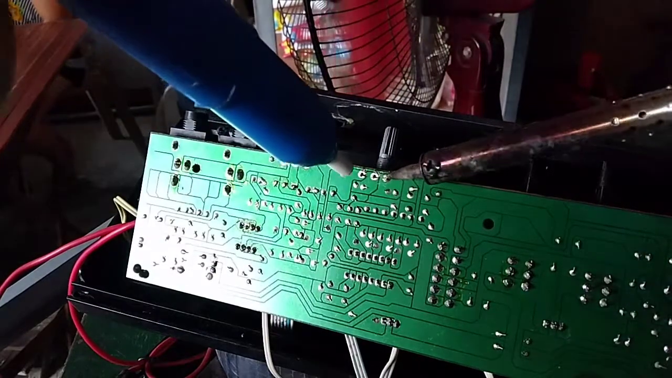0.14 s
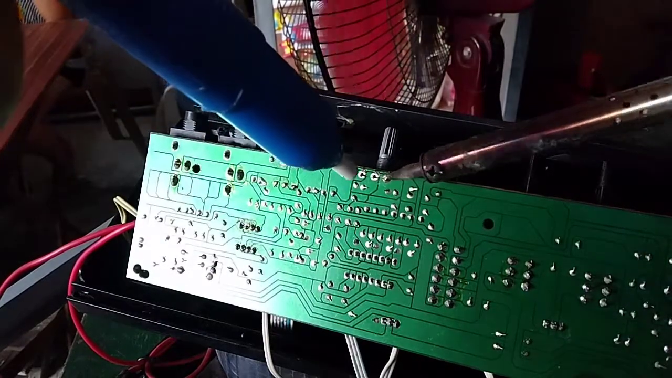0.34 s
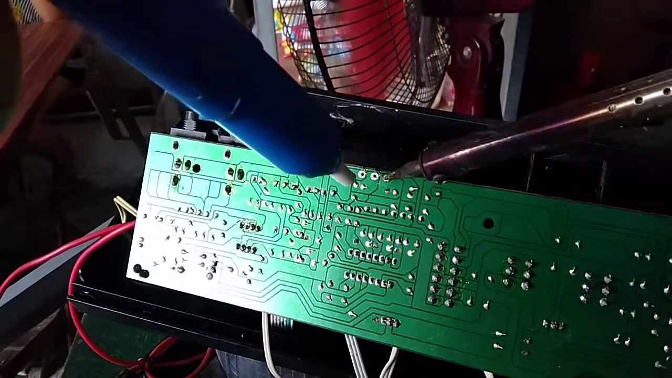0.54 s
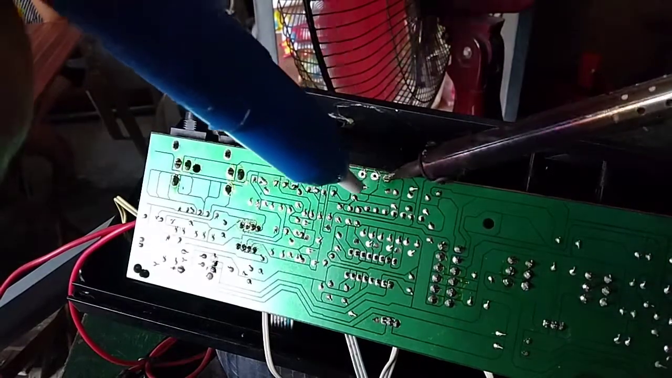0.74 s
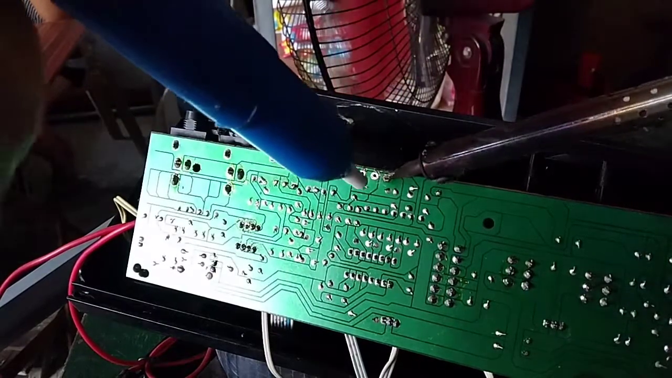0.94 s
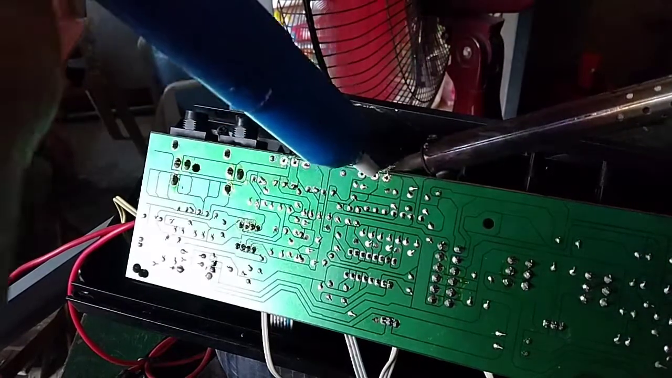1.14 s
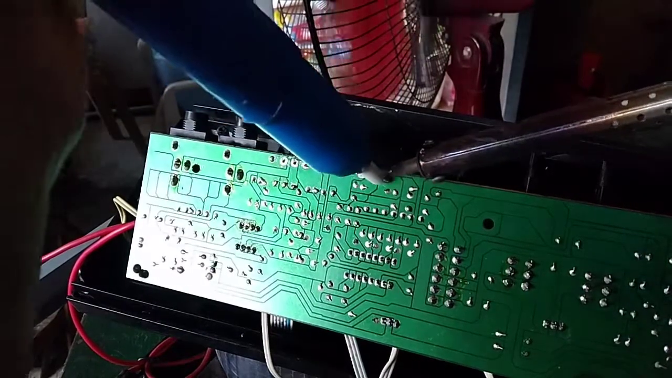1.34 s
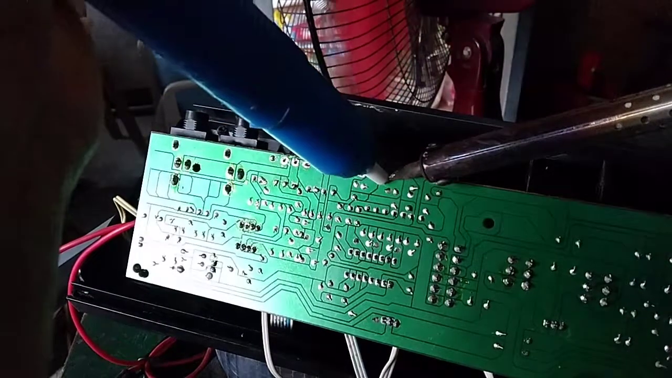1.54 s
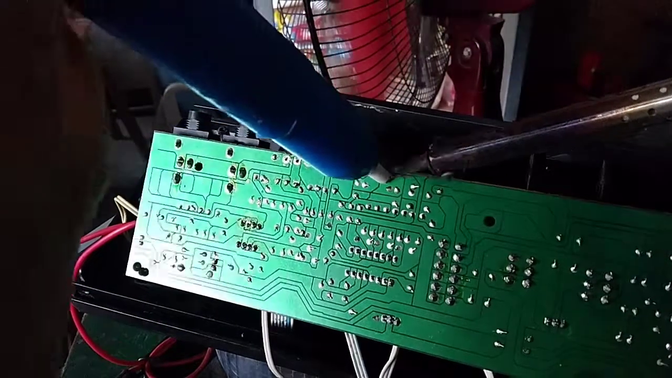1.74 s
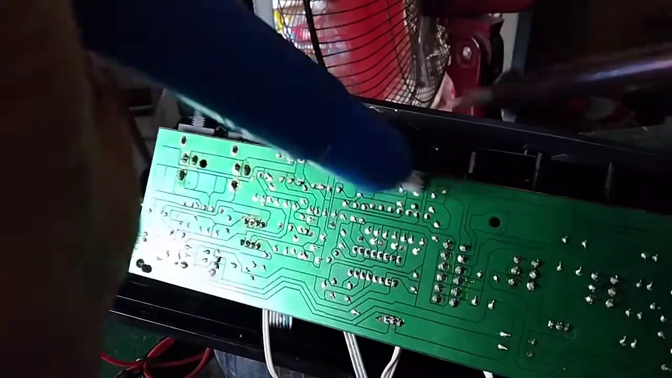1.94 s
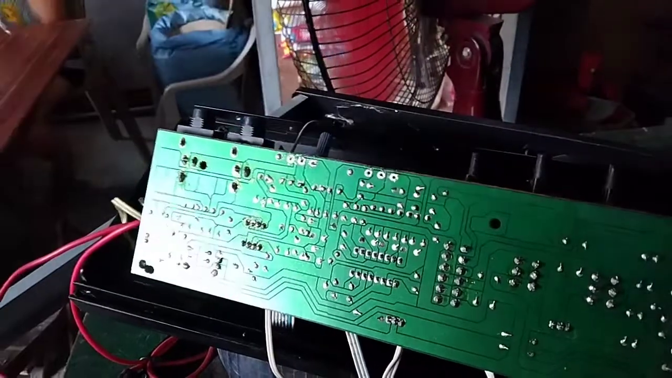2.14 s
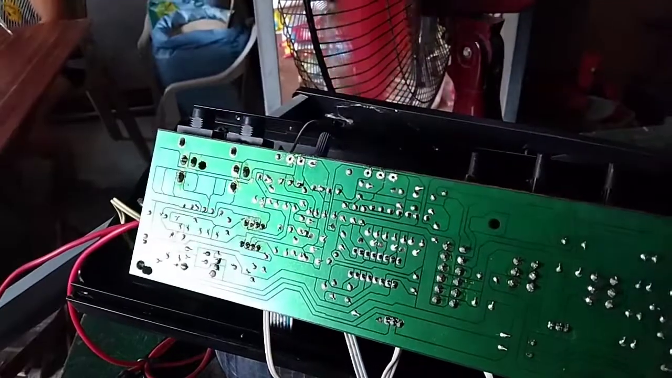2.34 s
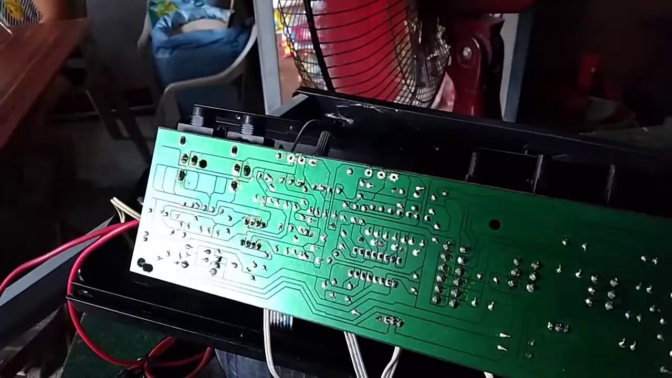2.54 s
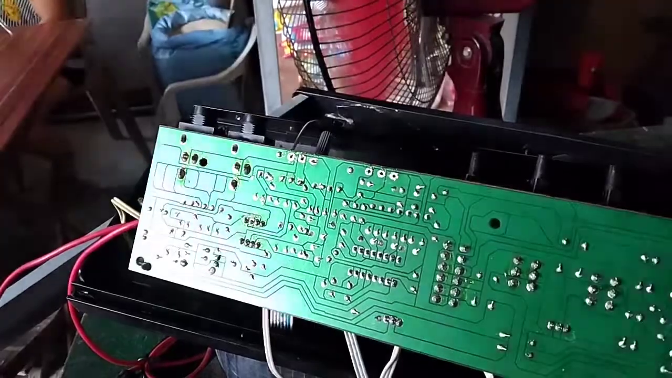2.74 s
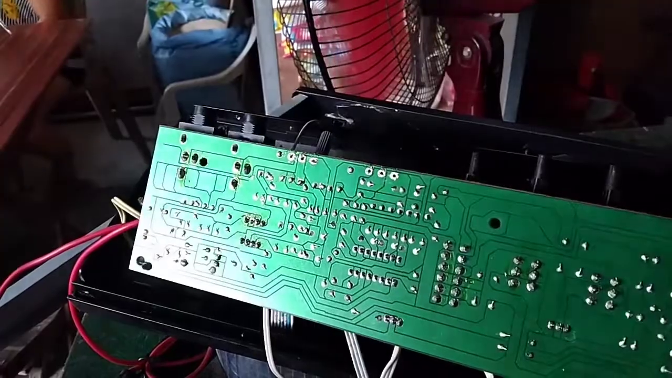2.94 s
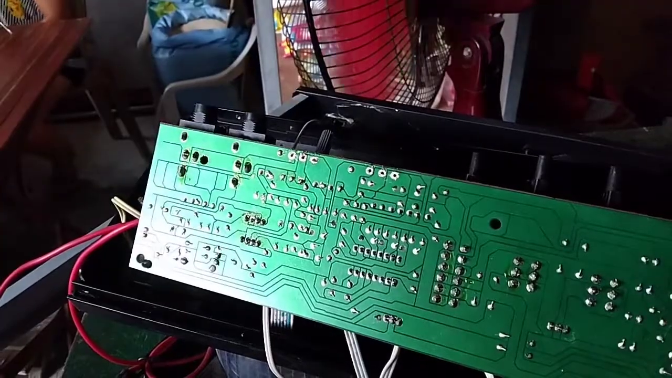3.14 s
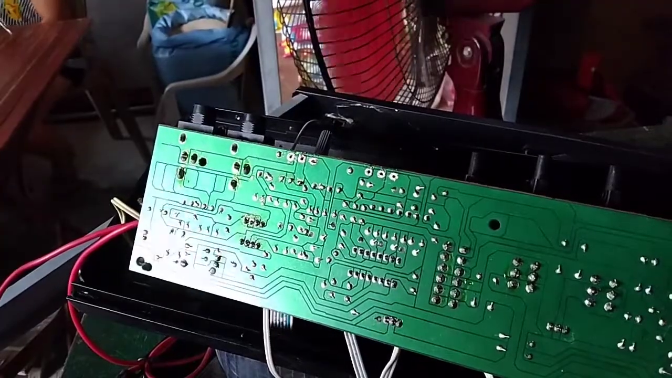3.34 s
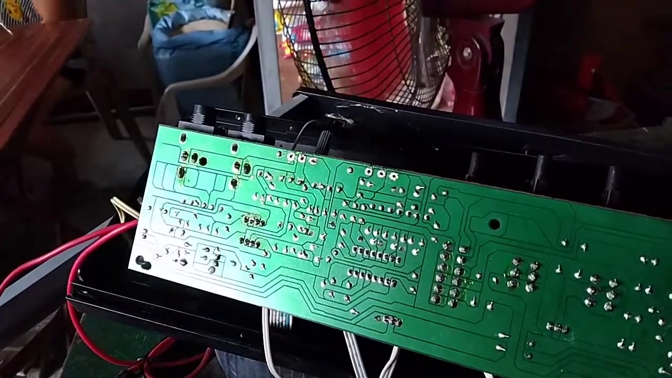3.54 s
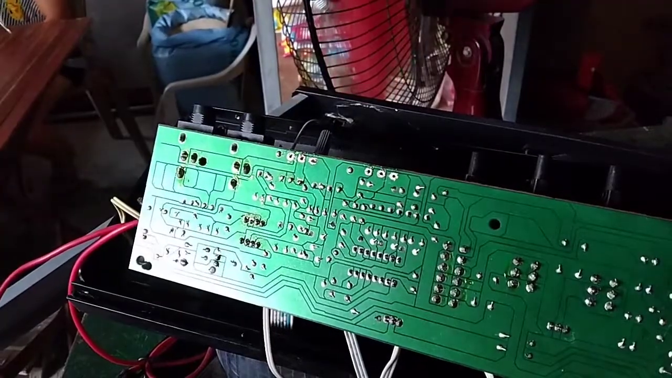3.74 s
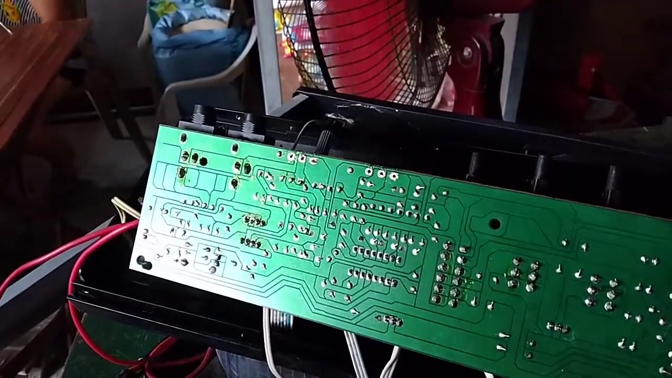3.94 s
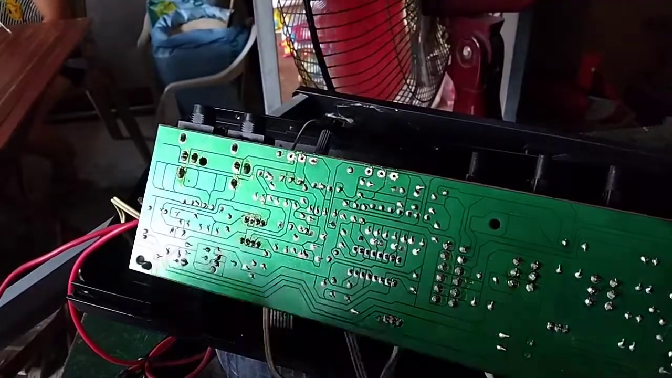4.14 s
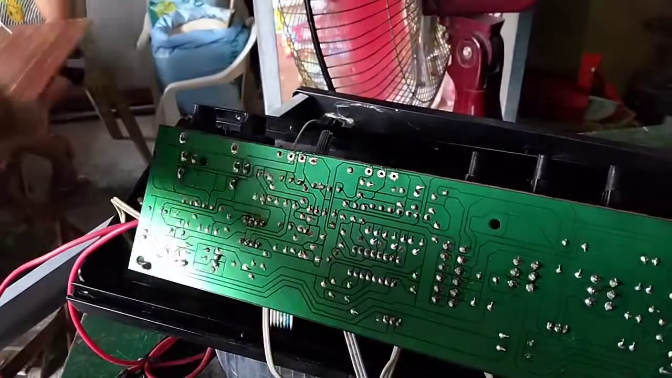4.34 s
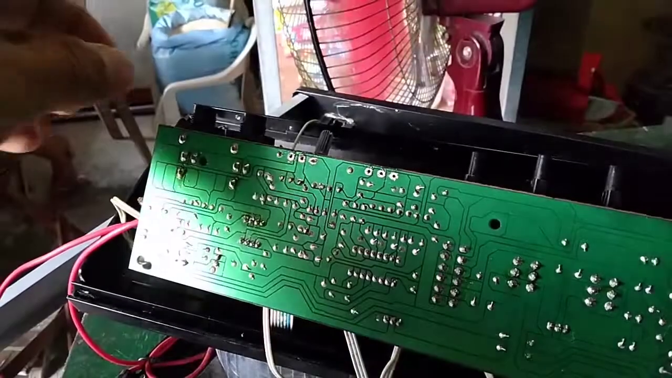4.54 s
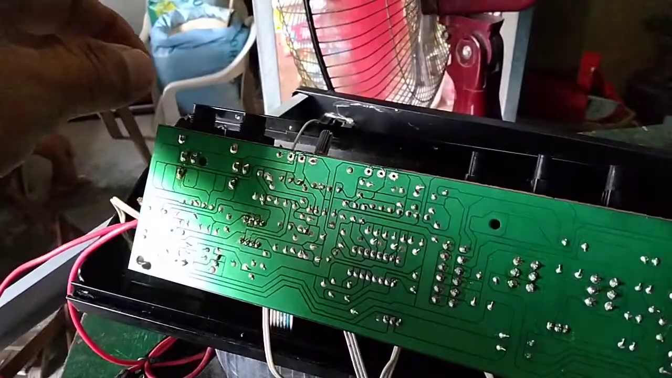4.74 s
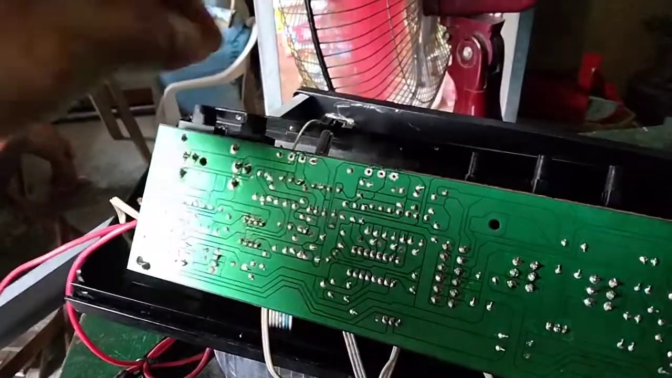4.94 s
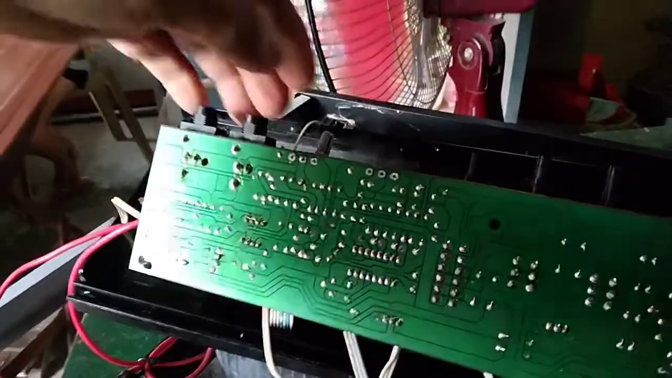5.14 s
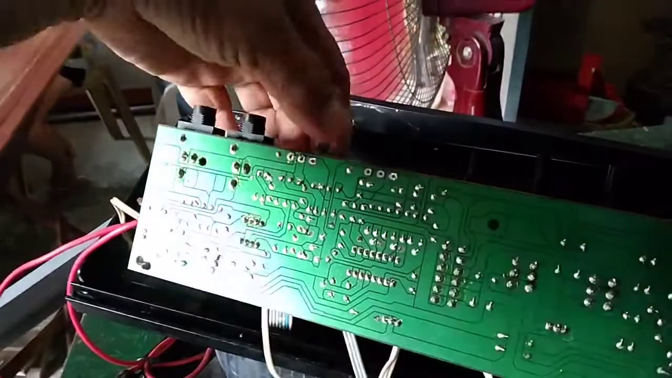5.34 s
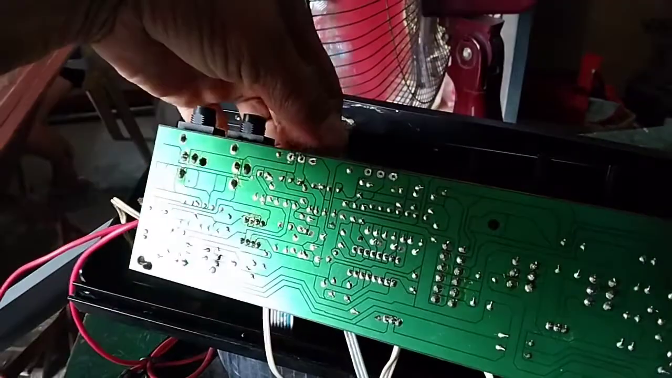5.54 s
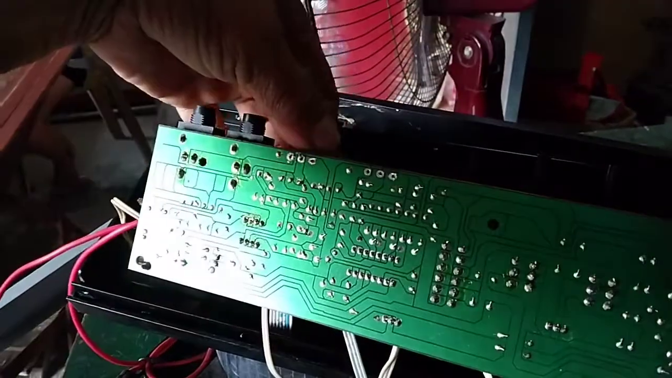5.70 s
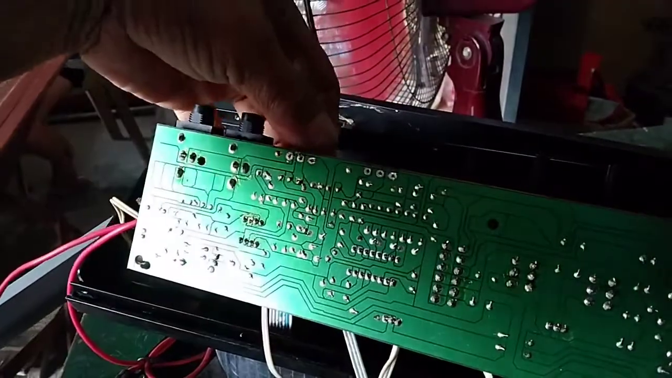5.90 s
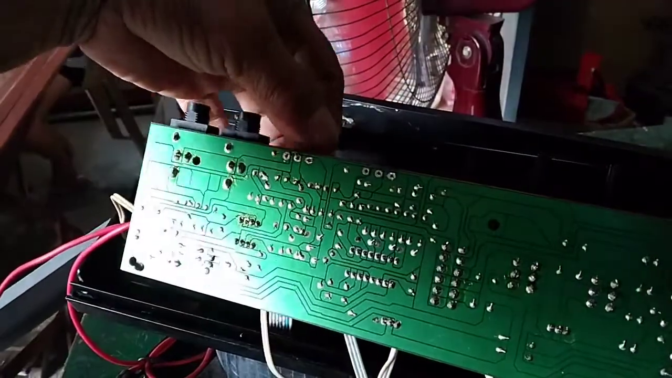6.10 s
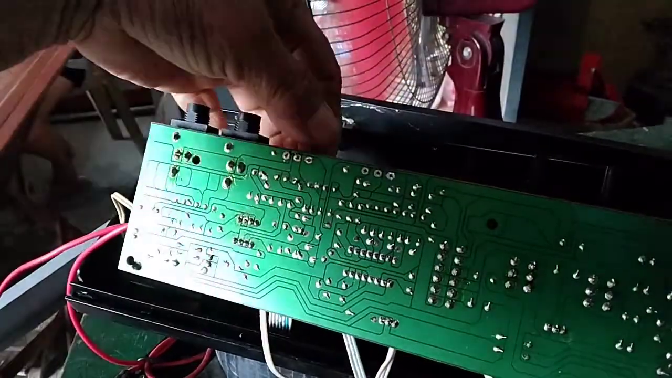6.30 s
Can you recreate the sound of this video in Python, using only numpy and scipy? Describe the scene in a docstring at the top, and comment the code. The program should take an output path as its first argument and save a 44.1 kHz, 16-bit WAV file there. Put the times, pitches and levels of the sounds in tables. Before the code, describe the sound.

A close microphone in a small workshop; a very faint wavering fan hum and high hiss lie beneath everything. After half a second of near quiet, a small catch tick precedes a sharp, bright snap of a spring-loaded pump at 0.64 s, with a short room tail. Quiet follows, with barely audible scuffing at 1.4 s. Light ticks at 1.75 s lead to a second snap at 1.88 s, a tight cluster of cracks with more metallic barrel ring and kick. Faint scraping begins around 2.4 s. From 2.97 to 3.35 s hard plastic lands and bounces on the bench in irregular woody clacks. Scraping and short hissing slides continue to about 4 s, with taps at 3.69 and 4.07 s. Between 4.85 and 5.45 s fingers handle the board: crisp ticks, rustling wires, low hollow thuds. Soft plastic taps come at 6.0 to 6.25 s.

```python
"""Desoldering pump at a workbench

A spring-loaded pump is fired twice at a circuit board, then dropped on the bench: noise bursts plus ringing modes.
Something slides over the bench, and a hand scuffs and bumps the board in its plastic case: rubbing is modulated
noise, ticks and thuds are bursts and modes. A fan hums in the small room as wavering noise."""
import sys
import numpy as np
from scipy import signal
from scipy.fft import rfft, irfft, next_fast_len
from scipy.io import wavfile
from scipy.ndimage import uniform_filter1d

SR = 44100
rng = np.random.default_rng(int(sys.argv[2]) if len(sys.argv) > 2 else 0)


def wrap_up_sound(samples):
    """Save the sound to the file named by the first command line argument, as 16-bit audio."""
    columns = np.atleast_2d(samples).T
    # keep every value between -1 and 1, then stretch to whole-number steps
    tamed = np.clip(columns, -1, 1)
    steps = np.round(tamed * 32767).astype(np.int16)
    wavfile.write(sys.argv[1], SR, steps)


N = 285106
SIZE = 16384  # samples in one hit or room response
TOP_HZ = 15550
T = np.arange(N) / SR
AGE = np.arange(SIZE) / SR


def undb(db):
    """Decibels to gain."""
    return 10 ** (np.asarray(db) / 20)


def on_log_axis(points, hz):
    """Read (frequency [Hz], value) points along log frequency."""
    f, value = np.transpose(points)
    return np.interp(np.log(np.maximum(hz, 1)), np.log(f), value)


def fade(t60_s):
    """Exponential decay that loses 60 dB in t60_s."""
    return np.exp(-np.log(1000) * AGE / np.maximum(t60_s, 1e-4))


def unit(x):
    """Scale a hit so that its loudest 2 ms have rms 1."""
    return x / np.sqrt(uniform_filter1d(x ** 2, size=88).max())


def add(track, s, sound):
    """Mix a sound into the track at time s."""
    i = int(s * SR)
    track[i:i + len(sound)] += sound[:N - i]


def ripple(hz, depth_db, spacing_hz):
    """Gain of the countless small resonances and notches of an irregular object."""
    knots = np.clip(rng.standard_normal(2048), -2, 2)
    return undb(depth_db * np.interp(hz / spacing_hz, np.arange(len(knots)), knots))


def crack(spectrum, t60_s, tilt_db, ripple_db, spacing_hz, size=151):
    """A contact: a dense, fast-dying burst in the causal colour of the object."""
    hz = np.fft.rfftfreq(SIZE, 1 / SR)
    burst = rfft(rng.standard_normal(SIZE) * fade(t60_s))
    smooth = np.sqrt(uniform_filter1d(abs(burst) ** 2, size=size))
    octaves = np.log2(np.maximum(hz, 150) / 1000)
    gain = undb(on_log_axis(spectrum, hz) + tilt_db * octaves)
    # folding the cepstrum makes the filter minimum-phase
    cepstrum = irfft(np.log(gain * ripple(hz, ripple_db, spacing_hz) / smooth))
    cepstrum[1:SIZE // 2] *= 2
    cepstrum[SIZE // 2 + 1:] = 0
    return unit(irfft(burst * np.exp(rfft(cepstrum))))


def ring(modes, tilt_db, spread=0.0034):
    """Decaying modes; each blow lands on another spot and shares them out a little differently."""
    hz, db, t60_s = np.transpose(modes)[:, :, None]
    detune, share, side = rng.standard_normal((len(modes), 3)).T[:, :, None]
    gain = np.sign(side) * undb(db + 2.9 * share + tilt_db * np.log2(hz / hz[0]))
    tones = np.sin(2 * np.pi * hz * (1 + spread * detune) * AGE)
    return unit(np.sum(gain * fade(t60_s) * tones, axis=0))


def coloured(x, spectrum):
    """Give a long sound a spectrum and rms 1."""
    size = next_fast_len(N)
    gain = undb(on_log_axis(spectrum, np.fft.rfftfreq(size, 1 / SR)))
    y = irfft(rfft(x, size) * gain, size)[:N]
    return y / y.std()


def walk(rate_hz):
    """Slow chance with a spread near 1."""
    knots = rng.standard_normal(1024)
    return 1.2 * np.interp(T * rate_hz, np.arange(len(knots)), knots)


def friction(spectrum, rough_db, catch_rate_hz, ripple_db, wander_db=7, drift=.02):
    """Surfaces catch and slip many times a second; contact spots take turns, each with its own resonances."""
    size = next_fast_len(N)
    hz = np.fft.rfftfreq(size, 1 / SR)
    shares = np.array([undb(wander_db * walk(9.3)) for _ in range(4)])
    shares /= np.linalg.norm(shares, axis=0)
    catches = undb(rough_db * walk(catch_rate_hz))
    spots = 0
    for share in shares:
        rubbed = rng.standard_normal(N) * catches * share
        spots = spots + rfft(rubbed, size) * ripple(hz, ripple_db, spacing_hz=130.76)
    # the resonances drift a little as the contact moves along
    place_s = T + np.cumsum(drift * walk(9)) / SR
    return np.interp(place_s, T, coloured(irfft(spots, size)[:N], spectrum))


def stroke(s, length_s, attack_s, release_s):
    """A rubbing movement swells linearly from s and dies away exponentially from s + length_s."""
    rise = np.clip((T - s) / attack_s, 0, 1)
    return rise * np.exp(-np.maximum(T - s - length_s, 0) / release_s)


# fan hum: (frequency [Hz], level [dB])
FAN_SPECTRUM = [(30, -27), (70, -18.5), (100, -16), (130, 2), (190, -1), (240, -1), (300, -26.5), (410, -2),
                (540, -17.5), (1000, -44.5), (4000, -81)]
# faint hiss of moving air: (frequency [Hz], level [dB])
AIR_SPECTRUM = [(300, -7.5), (600, -3), (900, -4), (1300, -4.5), (2200, -16.5), (4000, -18.5), (5300, -13),
                (7000, -27), (15500, -34)]
FAN_DB = -59.5


def fan():
    """Air buffets the fan blades, so the low hum wavers; the faint hiss above it stays smooth."""
    buffeting = undb(2.5 * walk(7))
    hum = coloured(rng.standard_normal(N) * buffeting, FAN_SPECTRUM)
    air = coloured(rng.standard_normal(N), AIR_SPECTRUM)
    return undb(FAN_DB) * (hum + undb(-1.0) * air)


# touch of thin metal: (frequency [Hz], level [dB])
TICK_SPECTRUM = [(100, -72.5), (500, -51.5), (2000, -41), (2900, -12.5), (4200, -2.5), (5600, 11.5),
                 (6700, -3.5), (8000, -3.5), (10000, -20.5), (15500, -45.5)]
# component leads: (frequency [Hz], level [dB], t60 [s])
LEAD_MODES = [(5800, -1, 0.04), (5140, -1, 0.06), (4630, -1.5, .04), (8000, -11.5, .03)]
TICK_RING_DB, TICK_RING_T60_S = -17, .009


def tick(tilt_db, hz):
    """One thin metal part touches, flicks free and rings briefly at its own pitch."""
    touch = crack(TICK_SPECTRUM, t60_s=0.007, tilt_db=tilt_db, ripple_db=7.0, spacing_hz=230.1)
    own = unit(fade(TICK_RING_T60_S) * np.sin(2 * np.pi * hz * AGE))
    leads = ring(LEAD_MODES, tilt_db, spread=0.036)
    return unit(touch + undb(TICK_RING_DB) * own + undb(-21.5) * leads)


# ticks of nozzle, wires and leads: (time [s], level [dB], tilt [dB/octave], pitch [Hz])
TICK_EVENTS = [(0.5703, -37, 0.5, 4430), (1.7552, -29, -2, 5000), (1.776, -35.5, -1.5, 5900),
               (1.853, -52, 12, 5470), (2.0596, -41, -15, 5000), (3.525, -39.5, -12.5, 4700),
               (4.4872, -46, -8.5, 5270), (4.554, -48.5, -1.5, 5500), (4.8455, -25, 2.5, 5900),
               (4.9338, -44, -3, 4554), (5.029, -31, -1, 5926), (5.06, -32, 1.5, 5360),
               (5.0886, -34.5, 12, 5100), (5.1173, -30, 8, 6360), (5.1307, -41, 0, 5540),
               (5.1577, -50, 0, 5050), (5.172, -48, -7, 5550), (5.2015, -33.5, 2, 5700),
               (5.369, -43.5, -7.5, 4770), (5.3961, -37.5, 2.5, 6000), (5.4466, -43, -2.5, 5300)]
# pump catch starts to slip: (time [s], level [dB])
RELEASE_EVENTS = [(0.555, -40.5), (1.7573, -47.5)]
# pump catch: (frequency [Hz], level [dB], t60 [s])
CATCH_MODES = [(1350, -13, 0.12), (3830, -11, 0.046), (5706, 2.5, 0.021), (7940, -15.5, 0.034),
               (8800, -17.5, 0.028)]
CATCH_RISE_S = .002  # time constant: the catch slips rather than strikes


def ticks():
    """Single clear ticks of nozzle, wires and leads, and the soft-edged ring of the catch before each shot."""
    out = np.zeros(N)
    for s, db, tilt_db, hz in TICK_EVENTS:
        add(out, s, undb(db) * tick(tilt_db, hz))
    slip = 1 - np.exp(-AGE / CATCH_RISE_S)
    for s, db in RELEASE_EVENTS:
        add(out, s, undb(db) * ring(CATCH_MODES, 0) * slip)
    return out


# taps on hollow plastic:
# (time [s], first contact [dB], second contact [dB], hollow ring [dB], tilt [dB/octave])
TAP_EVENTS = [(0.569, -66.5, -73.5, -44, -6.5), (3.688, -29, -59, -52, 0.5), (4.074, -37.5, -39, -46, 4.5),
              (4.546, -58.5, -48.5, -55, -12.5), (6.0131, -43, -59, -48, 6),
              (6.172, -46.5, -51.5, -39.5, 2), (6.252, -51.5, -53.5, -45, -1.5)]
# contact with plastic: (frequency [Hz], level [dB])
TAP_SPECTRUM = [(100, -19.5), (250, -22.5), (500, -17.5), (900, -7.5), (1450, 7.5), (2200, 7.5),
                (3300, -11), (5400, 10), (6800, -8), (8200, -3), (10000, -46), (15500, -38.5)]
# hollow plastic: (frequency [Hz], level [dB], t60 [s])
HOLLOW_MODES = [(451.7, -3.5, 0.077), (543, 2, 0.073), (576.3, -2.5, 0.11), (700, 1, 0.024),
                (977, -8.5, 0.066), (1420, -14.5, 0.13)]
SECOND_CONTACT_S = 0.0047  # after the first


def taps():
    """A tap on plastic, then a second, usually softer contact with a hollow ring."""
    out = np.zeros(N)
    for s, first_db, second_db, ring_db, tilt_db in TAP_EVENTS:
        for at_s, db in (s, first_db), (s + SECOND_CONTACT_S, second_db):
            contact = crack(TAP_SPECTRUM, t60_s=0.016, tilt_db=tilt_db, ripple_db=6.0, spacing_hz=133.85)
            add(out, at_s, undb(db) * contact)
        add(out, s + SECOND_CONTACT_S, undb(ring_db) * ring(HOLLOW_MODES, 0))
    return out


# piston hits its stop and kicks back: (time [s], level [dB], barrel ring [dB],
# recoil into the board [dB], tilt [dB/octave], share sent into the room [dB])
SNAP_EVENTS = [(0.6382, -13.5, -18.5, -37.5, -1.94, 2), (1.881, -17, -5, -7.5, 0, -2.5),
               (1.882, -15.5, -2, -18.5, 7.5, -3.5), (1.8959, -18.5, -5.5, -12.5, -3.5, -0.5),
               (1.8975, -14.5, -5, -16, 6.5, -4.5), (1.9021, -26.5, -9, -11.5, 3, -2.5)]
# piston impact: (frequency [Hz], level [dB])
SNAP_SPECTRUM = [(150, -58.5), (260, -32), (370, -16.5), (520, -4.5), (650, -4.5), (1050, -0.5),
                 (1450, -0.5), (1900, -8.5), (2700, -4), (3600, -7.5), (5000, 4.5), (6200, 0.5), (8000, -5),
                 (10000, -15.5), (12000, -25.5), (15500, -43.5)]
# pump barrel: (frequency [Hz], level [dB], t60 [s])
BARREL_MODES = [(712, -9, 0.061), (1120, -12.5, 0.041), (2760, -4.5, 0.044), (3203, 5, 0.024),
                (3900, -7, 0.03), (4930, 1.5, .04), (5140, -6.5, 0.065), (5780, 0.5, 0.031),
                (6400, -5.5, .04), (7400, -5.5, 0.015), (8104, -16.5, 0.085)]
# kick into the board: (frequency [Hz], level [dB])
RECOIL_SPECTRUM = [(40, -19), (70, -9.5), (100, -2.5), (170, -6.5), (250, -2.5), (310, -14), (440, 2),
                   (600, -4.5), (1500, -26.5), (6000, -50)]


def pump():
    """The piston slams home, rings the barrel and kicks the board; returns near sound and room feed."""
    near, outward = np.zeros((2, N))
    for s, db, barrel_db, recoil_db, tilt_db, room_db in SNAP_EVENTS:
        snap = crack(SNAP_SPECTRUM, t60_s=0.022, tilt_db=tilt_db, ripple_db=2.0, spacing_hz=150.0)
        barrel = undb(barrel_db) * ring(BARREL_MODES, tilt_db)
        recoil = crack(RECOIL_SPECTRUM, t60_s=0.019, tilt_db=0.5, ripple_db=-3.0, spacing_hz=49.8)
        shot = undb(db) * (snap + barrel + undb(recoil_db) * recoil)
        add(near, s, shot)
        add(outward, s, undb(room_db) * shot)
    return near, outward


TICKS_PER_S, TICK_SCATTER_DB = 88, 5  # all leads together
LEAD_HZ = 6050  # median lead pitch


def ticking(force, count=8):
    """Several leads flick at uneven moments, as hard as they are brushed."""
    out = np.zeros(N)
    for _ in range(count):
        jitter, size = rng.random(512), rng.standard_normal(512)
        at_s = (np.arange(len(jitter)) + jitter) * count / TICKS_PER_S
        at = (at_s * SR).astype(int)
        inside = at < N
        flicks = np.zeros(N)
        flicks[at[inside]] = undb(TICK_SCATTER_DB * np.minimum(size, 2))[inside]
        lead = tick(tilt_db=4.0, hz=LEAD_HZ * np.exp(0.3 * rng.standard_normal()))
        out += signal.oaconvolve(flicks * force, lead)[:N]
    return out


# nozzle and fingers scuff the board; the 0.733 s row is a soft low rumble after the first shot:
# (time [s], length [s], wire rustle [dB], rasp [dB], low rumble [dB], ticking [dB])
SCUFF_EVENTS = [(0.733, 0.06, -67, -79.5, -56, -80), (1.39, .1, -67, -71, -77, -73.5),
                (1.745, .115, -65.5, -61, -81, -60.5), (2.074, 0.053, -77.5, -71, -80, -63.5),
                (2.207, 0.074, -66.5, -88, -78.5, -67), (4.227, 0.06, -60, -67, -80.5, -100),
                (4.471, 0.082, -74, -56.5, -59.5, -67), (4.839, 0.1, -59.5, -74, -49, -55),
                (5.048, 0.13, -53, -57, -52, -43.5), (5.265, 0.084, -49.5, -54.5, -44.5, -53.5),
                (5.375, 0.14, -64, -66, -50.5, -60.5), (5.625, 0.091, -65.5, -69, -71.5, -73.5)]
# rustling wires: (frequency [Hz], level [dB])
RUSTLE_SPECTRUM = [(500, -17.5), (850, -11), (1150, -9), (1500, -24), (1900, -35), (2700, -22), (3300, -10),
                   (4300, 2), (5000, 10), (5800, 9.5), (6600, 1), (8200, -3), (10000, -26), (15000, -41)]
# dry edge of the board: (frequency [Hz], level [dB])
RASP_SPECTRUM = [(300, -22.5), (800, -8), (1250, 0), (1700, -15.5), (2300, -16.5), (2900, -7.5), (3700, -4),
                 (4700, -2.5), (8000, -28), (12000, -35)]
# low rumble: (frequency [Hz], level [dB])
RUMBLE_SPECTRUM = [(40, -38), (90, -10), (145, 9.5), (200, -4.5), (255, 2.5), (310, -5.5), (407, 1),
                   (490, -9), (610, -6), (900, -33.5), (2000, -80)]
SCUFF_ATTACK_S, SCUFF_RELEASE_S = 0.013, 0.023


def scuffing():
    """Soft rumble after the first shot, then scuffs: wires rustle, edge rasps, board rumbles, leads flick."""
    rows = np.array(SCUFF_EVENTS)
    strokes = np.array([stroke(s, length_s, SCUFF_ATTACK_S, SCUFF_RELEASE_S) for s, length_s in rows[:, :2]])
    rustle, rasp, rumble, flick = undb(rows[:, 2:]).T @ strokes
    wires = rustle * friction(RUSTLE_SPECTRUM, rough_db=4.5, catch_rate_hz=230, ripple_db=5,
                              wander_db=17.5, drift=.005)
    edge = rasp * friction(RASP_SPECTRUM, rough_db=2.5, catch_rate_hz=160, ripple_db=10.0)
    lows = rumble * friction(RUMBLE_SPECTRUM, rough_db=2.0, catch_rate_hz=74, ripple_db=1.5)
    return wires + edge + lows + ticking(flick)


# resonant scrape over the bench: (time [s], level [dB])
SCRAPE_LEVELS = [(2.398, -73.5), (2.62, -62.5), (2.88, -60), (3.1, -50), (3.5, -51), (3.66, -56),
                 (3.77, -52.5), (3.95, -61), (4.149, -54), (4.4, -65.5), (4.561, -57.5), (4.719, -80)]
# resonant scrape: (frequency [Hz], level [dB])
SCRAPE_SPECTRUM = [(200, -41.5), (420, -4.5), (600, -24.5), (900, -9.5), (1220, -3), (1550, -4.5),
                   (1800, 0.5), (2100, -5), (2750, -9), (3300, -15), (4100, -10.5), (5200, 0.5),
                   (6300, -15.5), (12000, -43)]
# quick smooth slides: (time [s], length [s], level [dB], tilt [dB/octave])
SWISH_EVENTS = [(2.488, 0.1, -60.5, -4), (3.37, 0.16, -51.5, 5.5), (3.536, 0.12, -57.5, 11),
                (3.689, 0.12, -56.5, -6), (3.848, 0.165, -49.5, 0.5)]
# sliding hiss: (frequency [Hz], level [dB])
HISS_SPECTRUM = [(1200, -35.5), (1900, -5.5), (2700, -16.5), (3600, -24.5), (5310, 6.5), (6050, 7),
                 (6940, -0.5), (8010, 4), (9850, -13), (15500, -19)]
SWISH_ATTACK_S, SWISH_RELEASE_S = 0.11, 0.019
MIRROR_S, MIRROR_WANDER, MIRROR_GAIN = .0007, 0.12, 0.23  # median lag, its log spread, gain


def sliding():
    """A resonant scrape follows a level curve; separate hissing slides are mirrored by the bench."""
    s, db = np.transpose(SCRAPE_LEVELS)
    scrape = undb(np.interp(T, s, db, left=-120, right=-120))
    hiss = friction(HISS_SPECTRUM, rough_db=4.5, catch_rate_hz=58, ripple_db=5.0)
    swish = np.zeros(N)
    for s, length_s, db, tilt_db in SWISH_EVENTS:
        tilt = [(hz, tilt_db * np.log2(hz / TOP_HZ)) for hz, _ in HISS_SPECTRUM]
        swell = stroke(s, length_s, SWISH_ATTACK_S, SWISH_RELEASE_S)
        swish += undb(db) * swell * coloured(hiss, tilt)
    # the moving lag sweeps the colour of the hiss
    lag_s = MIRROR_S * np.exp(MIRROR_WANDER * walk(10))
    mirrored = np.interp(T - lag_s, T, swish)
    rubbing = friction(SCRAPE_SPECTRUM, rough_db=3.5, catch_rate_hz=440, ripple_db=5.0,
                       wander_db=14.5, drift=0.025)
    return swish + MIRROR_GAIN * mirrored + scrape * rubbing


# tools land on the bench; the 4.081 s row is the low body of the plastic tap at 4.07 s:
# (time [s], level [dB], bench ring [dB], low thump [dB], tilt [dB/octave])
KNOCK_EVENTS = [(2.9655, -18, -4.5, -21.5, 0.5), (2.9696, -32, 4.5, -13.5, -0.5), (2.979, -26, 1, -12, 1),
                (3.0425, -22, -10.5, -11, 2), (3.0459, -32, 0.5, -13.5, -1.5),
                (3.182, -23.5, -1.5, -2.5, 5.5), (3.187, -24.5, 0.5, 5, -8), (3.1922, -25, -9, 5, 10),
                (3.2264, -15, -7.5, -14, 3), (3.2489, -24.5, -2, -2.5, 4), (3.2643, -29.5, -10, 5, 2),
                (3.272, -33.5, -5, -0.5, 8.5), (3.295, -31.5, -14, -0.5, -6), (3.3371, -22.5, -0.5, -15, 2),
                (3.3449, -27.5, 1, -10, -2.5), (4.081, -38.5, -7.5, -13.5, 7.5)]
# hard plastic on the bench: (frequency [Hz], level [dB])
CLACK_SPECTRUM = [(30, -39.5), (70, -36), (130, -15.5), (300, 7.5), (700, 7), (1050, 10.5), (1500, 2.5),
                  (2000, -3.5), (3200, -11), (5200, -7), (6500, -17.5), (8200, -23.5), (10000, -45.5),
                  (15500, -61)]
# bench thumped as a whole: (frequency [Hz], level [dB])
THUMP_SPECTRUM = [(40, -26), (80, -18.5), (120, 2.5), (165, -4), (260, 5), (330, -9), (470, 4.5),
                  (650, -24.5), (1500, -34), (6000, -70.5)]
# bench top: (frequency [Hz], level [dB], t60 [s])
BENCH_MODES = [(165, -8.5, .1), (254.5, -6.5, 0.28), (406, -4.5, 0.12), (500, -11.5, 0.14), (628, -3, 0.15),
               (731.6, 6.5, 0.054), (890, -5.5, 0.11), (1004, -6.5, 0.16), (1118, 4, .1), (1412, -2, 0.091),
               (1469, 5, 0.068), (1908, -12, 0.13)]
EDGE_DB = -5  # first hard touch, against its clack
BENCH_LOW_HZ = 88  # the bench top radiates little below this


def bench():
    """Hard plastic lands, bounces and settles: clack, bench ring and thump; the last row gives a tap its body."""
    out = np.zeros(N)
    for s, db, ring_db, thump_db, tilt_db in KNOCK_EVENTS:
        clack = crack(CLACK_SPECTRUM, t60_s=0.045, tilt_db=tilt_db, ripple_db=-1.5, spacing_hz=96.7, size=101)
        thump = crack(THUMP_SPECTRUM, t60_s=0.0096, tilt_db=2, ripple_db=1, spacing_hz=60.7, size=41)
        edge = crack(CLACK_SPECTRUM, t60_s=0.0049, tilt_db=tilt_db, ripple_db=-3.5, spacing_hz=100)
        top = ring(BENCH_MODES, tilt_db, spread=0.005)
        knock = undb(EDGE_DB) * edge + clack + undb(ring_db) * top + undb(thump_db) * thump
        add(out, s, undb(db) * knock)
    return signal.sosfilt(signal.butter(2, BENCH_LOW_HZ, "high", fs=SR, output="sos"), out)


# board bumps in its case: (time [s], level [dB], tilt [dB/octave], case ring [dB])
BUMP_EVENTS = [(4.885, -29, -9.5, -6), (5.083, -23, 5, 3), (5.091, -26.5, 4.5, 6),
               (5.135, -35.5, -6.5, 3.5), (5.199, -32, -9.5, 0), (5.449, -25, -8, 2.5)]
# board on case: (frequency [Hz], level [dB])
THUD_SPECTRUM = [(35, -36.5), (60, -22.5), (90, -11.5), (150, -6), (400, -4.5), (620, -5), (900, -22),
                 (1400, -33), (2200, -62), (6000, -84)]
# plastic case: (frequency [Hz], level [dB], t60 [s])
CASE_MODES = [(134, -4, 0.088), (159.4, 3.5, .06), (250.5, -5, 0.097), (383, -1.5, 0.051),
              (474, -5.5, 0.032), (532, -14, 0.032), (624, -13, 0.13)]


def bumps():
    """The board gives under the fingers and thuds on the case, which swings for a few cycles."""
    out = np.zeros(N)
    for s, db, tilt_db, case_db in BUMP_EVENTS:
        thud = crack(THUD_SPECTRUM, t60_s=0.03, tilt_db=tilt_db, ripple_db=4.5, spacing_hz=75.0, size=41)
        case = ring(CASE_MODES, tilt_db, spread=0.0045)
        add(out, s, undb(db) * (undb(-6) * thud + undb(case_db) * case))
    return out


# room decay: (frequency [Hz], t60 [s])
ROOM_DECAY = [(120, 0.99), (500, 0.45), (1400, 0.36), (5000, 0.32), (8000, .29), (14000, 0.25)]
FAR_WALL_S = .088


def room(x, onset_s=0.0051, far_wall_db=2):
    """Dense reflections off bench and walls, a later cluster from the far wall; the treble dies first."""
    hz = np.fft.rfftfreq(SIZE, 1 / SR)
    noise = rfft(rng.standard_normal(SIZE)) * ripple(hz, depth_db=2, spacing_hz=80)
    edges_hz = np.geomspace(60, 18000, 13)
    tail = np.zeros(SIZE)
    for lo, hi in zip(edges_hz, edges_hz[1:]):
        band = irfft(noise * ((hz >= lo) & (hz < hi)))
        tail += band * fade(on_log_axis(ROOM_DECAY, np.sqrt(lo * hi)))
    tail *= 1 - np.exp(-(AGE / onset_s) ** 2)
    tail *= undb(far_wall_db * np.exp(-((AGE - FAR_WALL_S) / 0.013) ** 2))
    return signal.fftconvolve(x, tail / np.linalg.norm(tail))[:N]


# gain of a closed suppressor band: (frequency [Hz], gain [dB])
CLOSED_GAIN = [(300, -6.5), (900, -23), (6000, -16.5)]
OPEN_DB, GATE_SMOOTH_S = 5.5, 0.025  # opening point above steady noise, power smoothing time constant


def suppress(x, size=1024):
    """Noise suppressor: narrow bands open above their own steady noise; faint rubbing passes in patches."""
    hop = size // 4
    hz, _, bands = signal.stft(x, SR, nperseg=size, noverlap=size - hop)
    keep = np.exp(-hop / SR / GATE_SMOOTH_S)
    power = signal.lfilter([1 - keep], [1, -keep], abs(bands) ** 2)
    steady = uniform_filter1d(np.percentile(power, 20, axis=-1), size=7)[..., None]
    excess = (power / (steady * undb(OPEN_DB) ** 2)) ** 3
    closed = undb(on_log_axis(CLOSED_GAIN, hz))[:, None]
    gated = bands * (closed + excess) / (1 + excess)
    return signal.istft(gated, SR, nperseg=size, noverlap=size - hop)[1][..., :N]


def scene():
    """All sources, with the share of each sent into the room."""
    (snaps, outward), knocks, thuds = pump(), bench(), bumps()
    handling = ticks() + taps() + sliding() + scuffing()
    reflections = room(undb(-12.5) * outward + undb(-11.5) * knocks + undb(-13.5) * thuds
                       + undb(-8.5) * handling)
    # two further independent draws of snaps and room are summed for a denser, smoother tail
    extra_tail = undb(-17) * (room(pump()[1]) + room(pump()[1]))
    return (snaps + knocks + thuds + handling + reflections + extra_tail + fan())[None]


MIC_HISS_DB = -75.5  # before the top cut


def record(dry):
    """The recorder drops the deep bass, suppresses steady noise, adds a faint high hiss and cuts the top."""
    hiss = coloured(rng.standard_normal(N), [(8500, -22.5), (9500, 0.0), (12000, 1.0), (16000, 2.5)])
    lean = signal.sosfilt(signal.butter(2, 60, "high", fs=SR, output="sos"), dry)
    sound = suppress(lean) + undb(MIC_HISS_DB) * hiss
    return signal.sosfilt(signal.ellip(10, .2, 70, TOP_HZ, fs=SR, output="sos"), sound)


dry = scene()
out = record(dry)
wrap_up_sound(out)
```